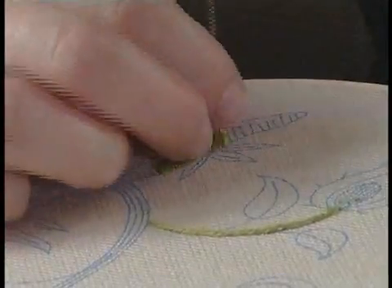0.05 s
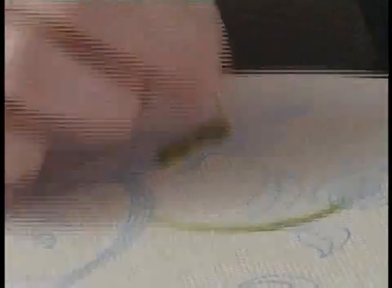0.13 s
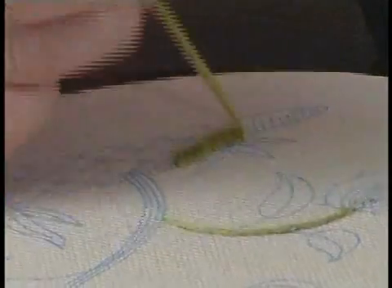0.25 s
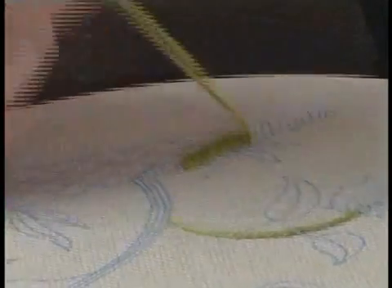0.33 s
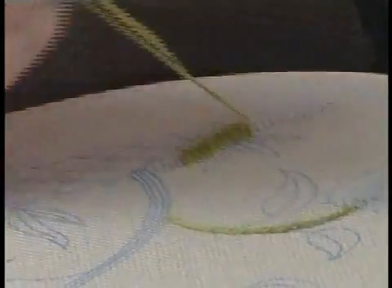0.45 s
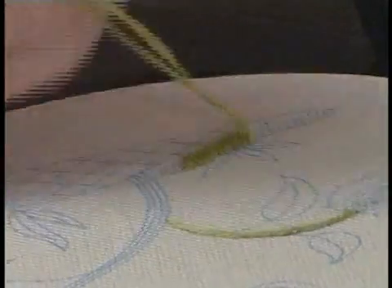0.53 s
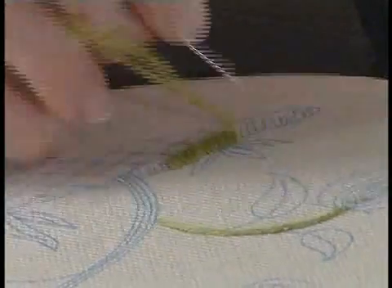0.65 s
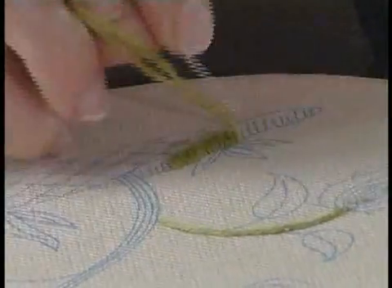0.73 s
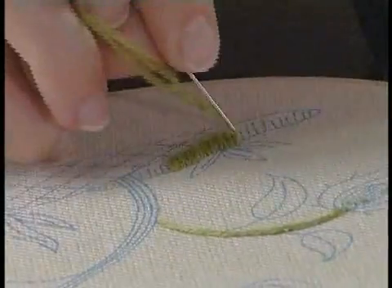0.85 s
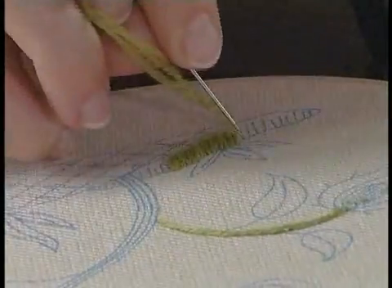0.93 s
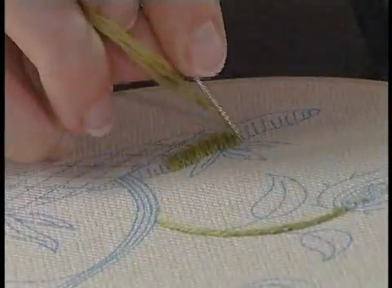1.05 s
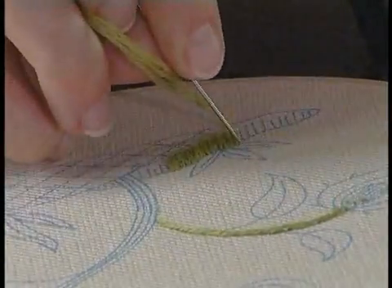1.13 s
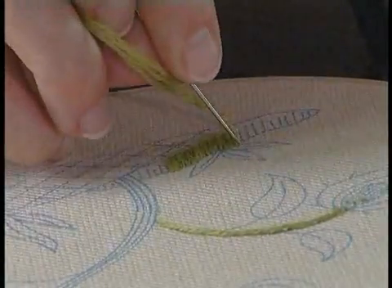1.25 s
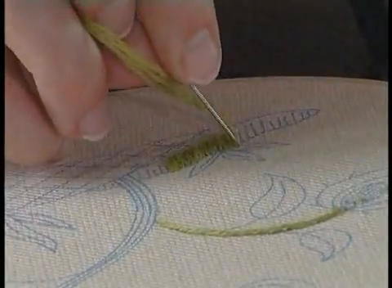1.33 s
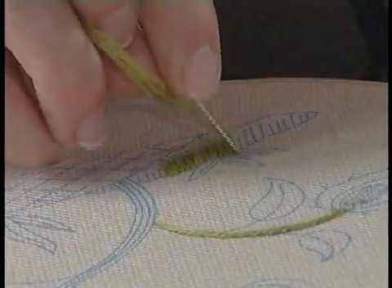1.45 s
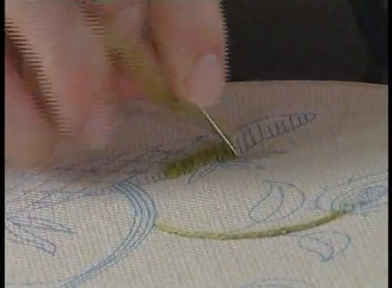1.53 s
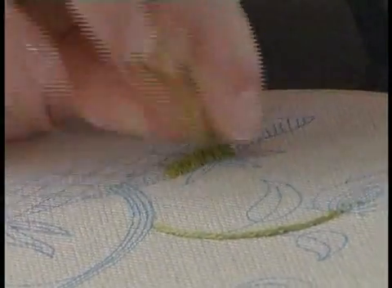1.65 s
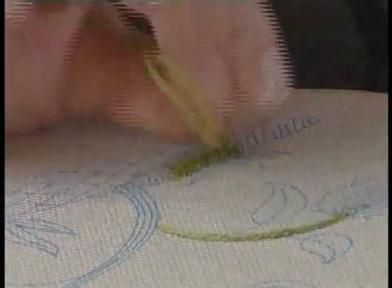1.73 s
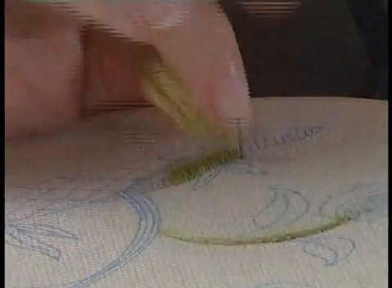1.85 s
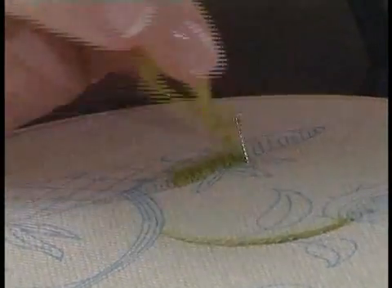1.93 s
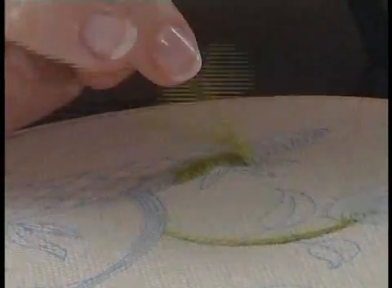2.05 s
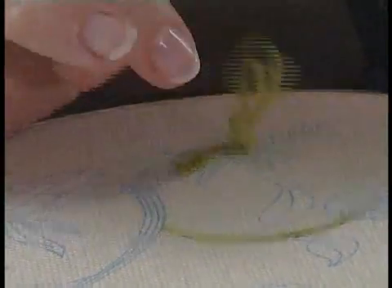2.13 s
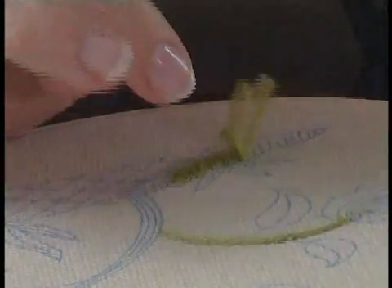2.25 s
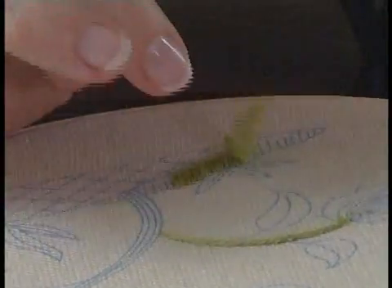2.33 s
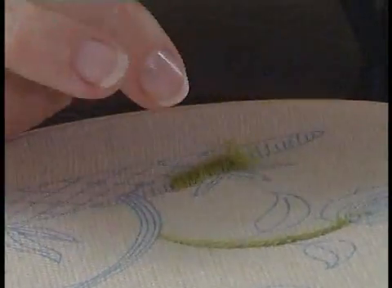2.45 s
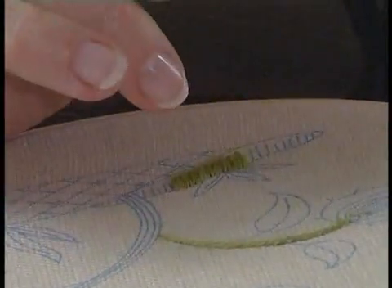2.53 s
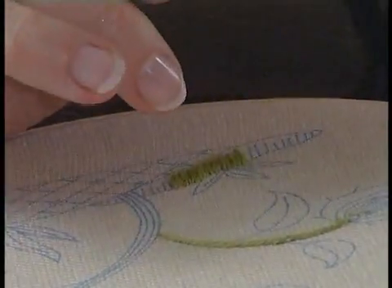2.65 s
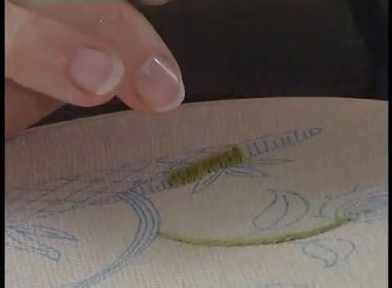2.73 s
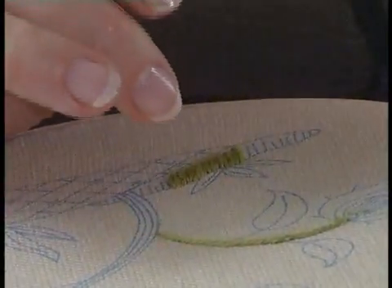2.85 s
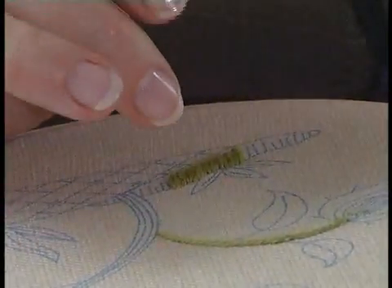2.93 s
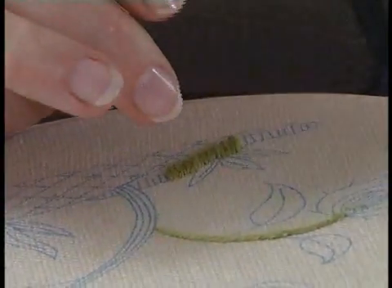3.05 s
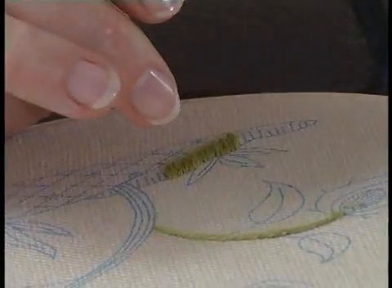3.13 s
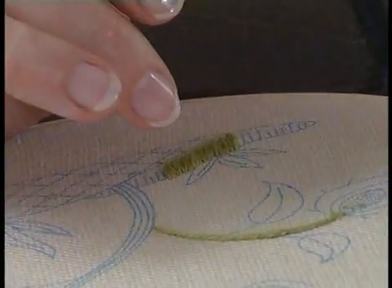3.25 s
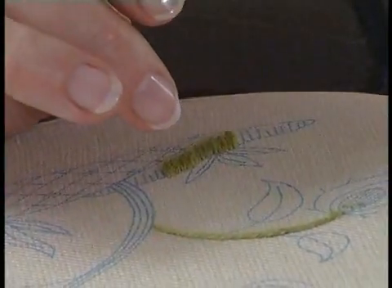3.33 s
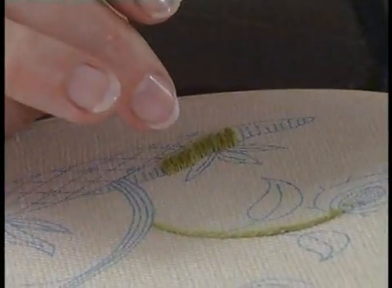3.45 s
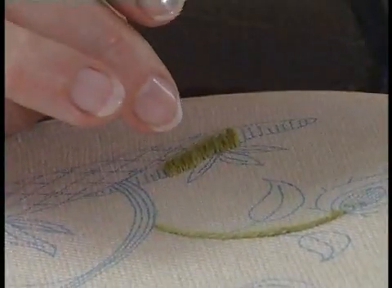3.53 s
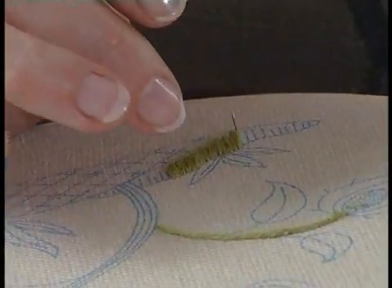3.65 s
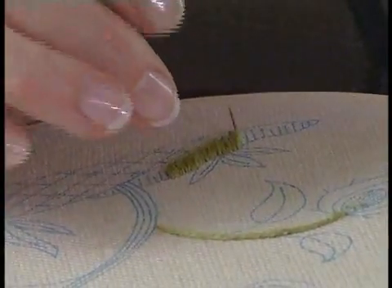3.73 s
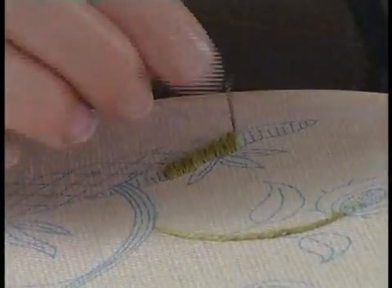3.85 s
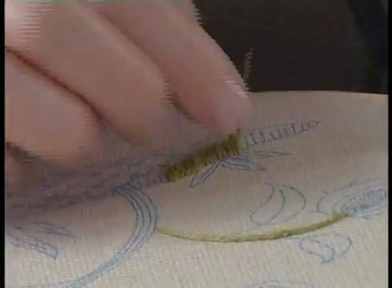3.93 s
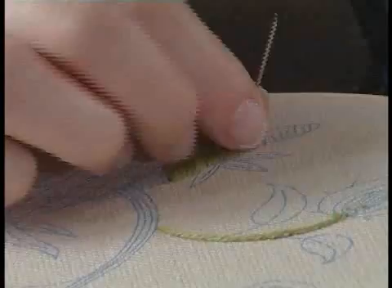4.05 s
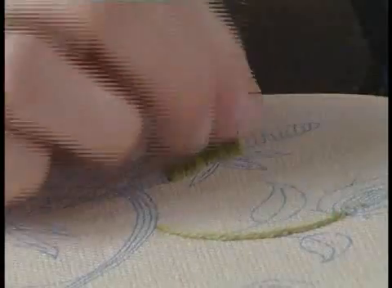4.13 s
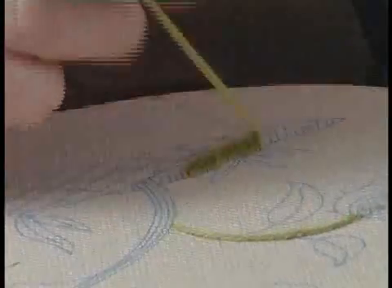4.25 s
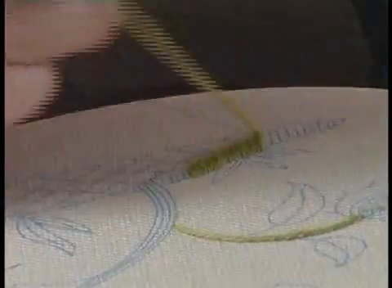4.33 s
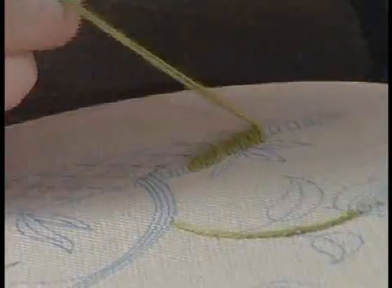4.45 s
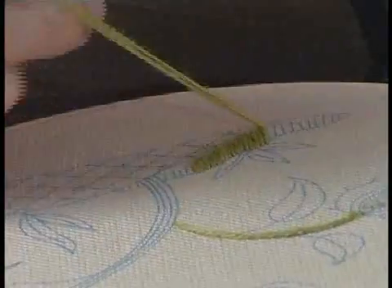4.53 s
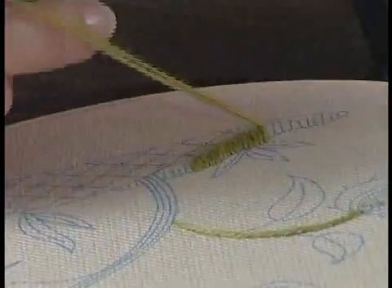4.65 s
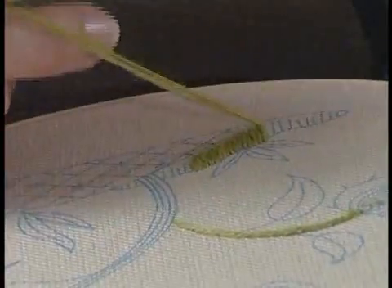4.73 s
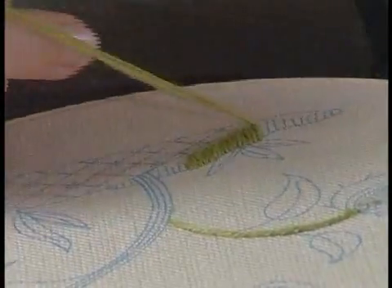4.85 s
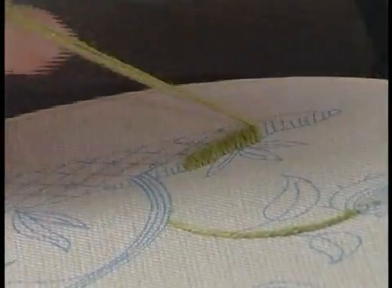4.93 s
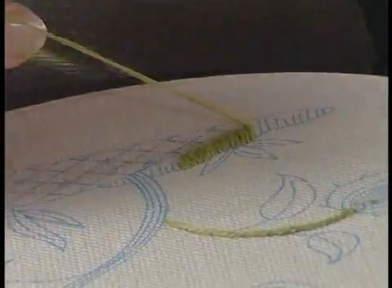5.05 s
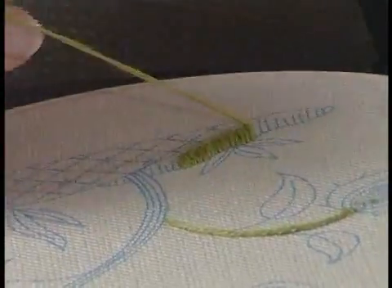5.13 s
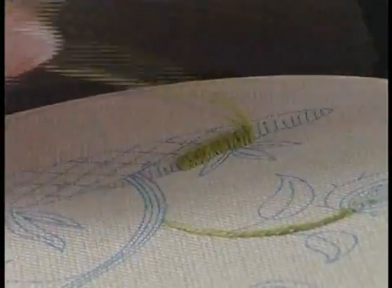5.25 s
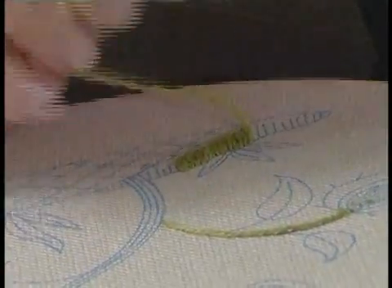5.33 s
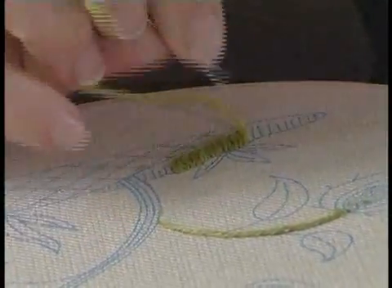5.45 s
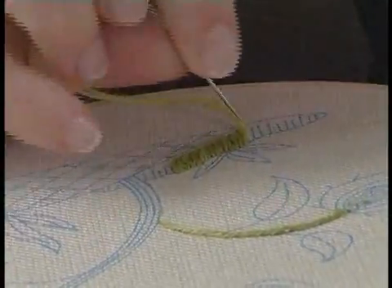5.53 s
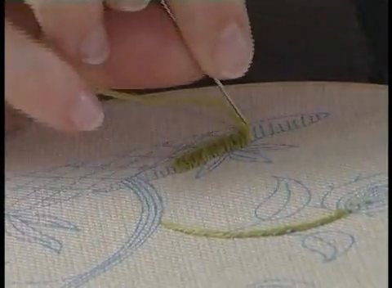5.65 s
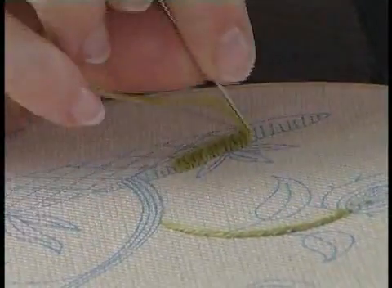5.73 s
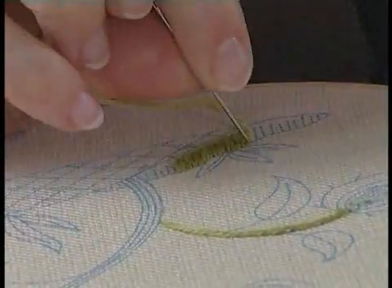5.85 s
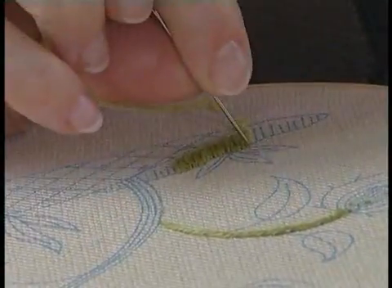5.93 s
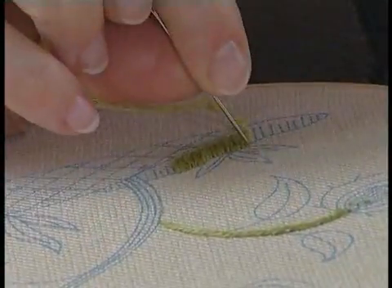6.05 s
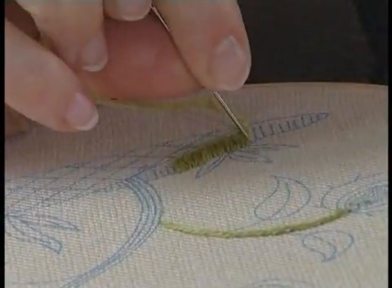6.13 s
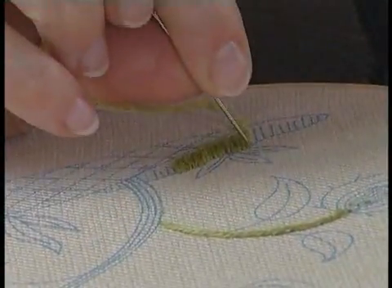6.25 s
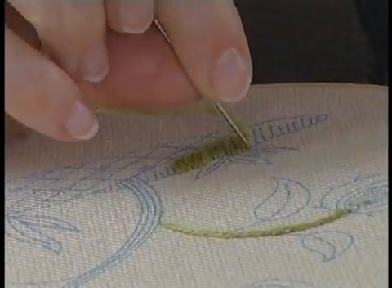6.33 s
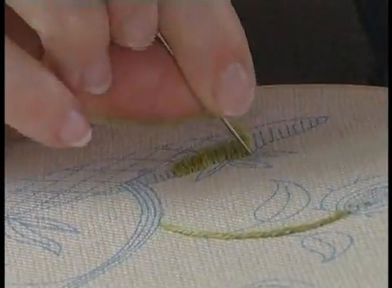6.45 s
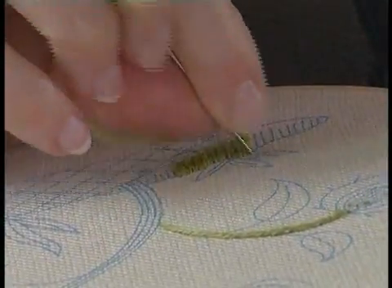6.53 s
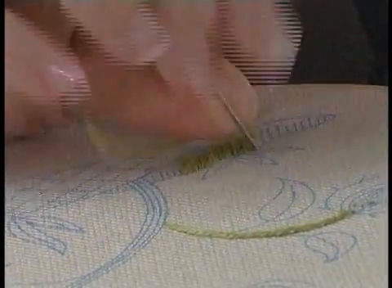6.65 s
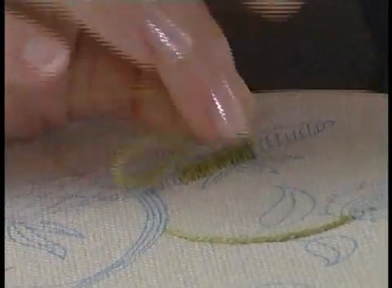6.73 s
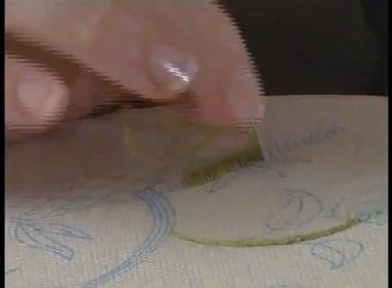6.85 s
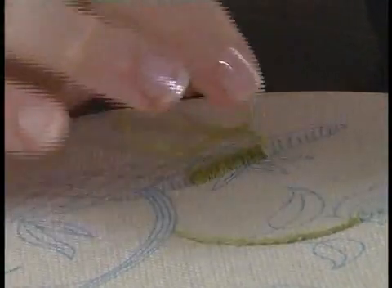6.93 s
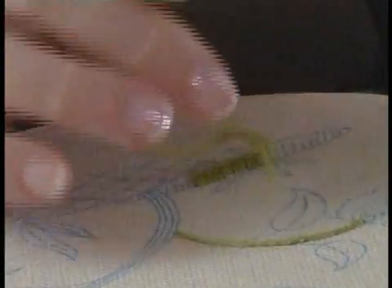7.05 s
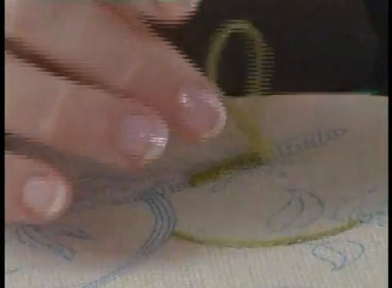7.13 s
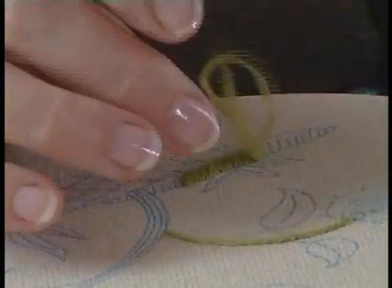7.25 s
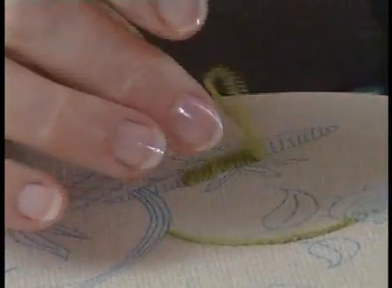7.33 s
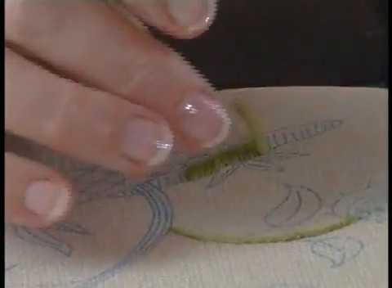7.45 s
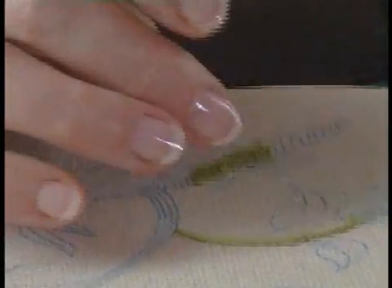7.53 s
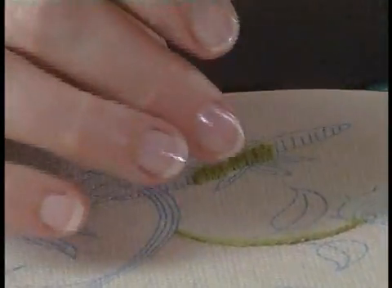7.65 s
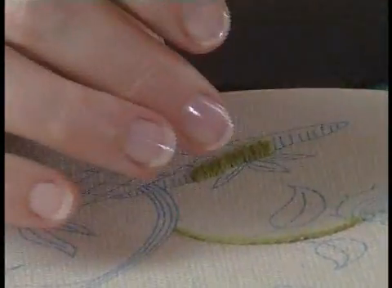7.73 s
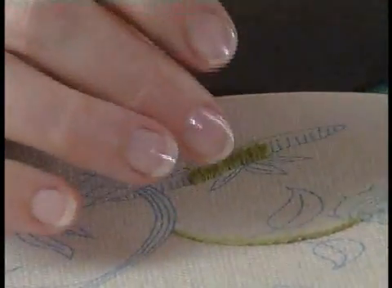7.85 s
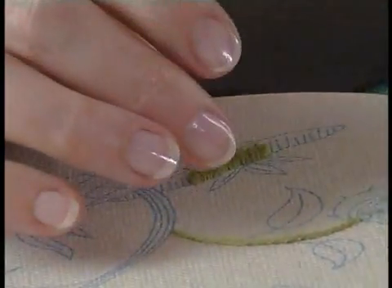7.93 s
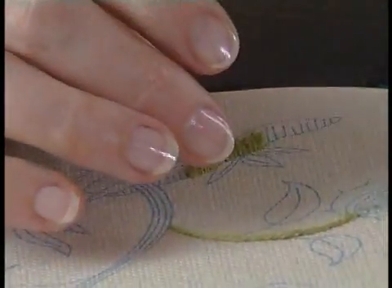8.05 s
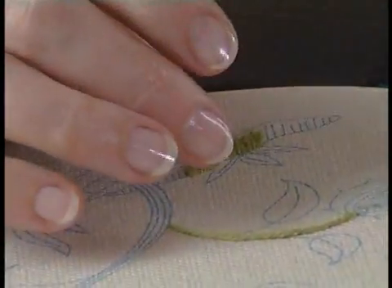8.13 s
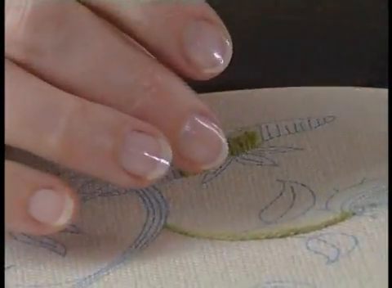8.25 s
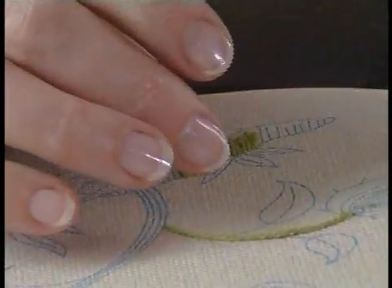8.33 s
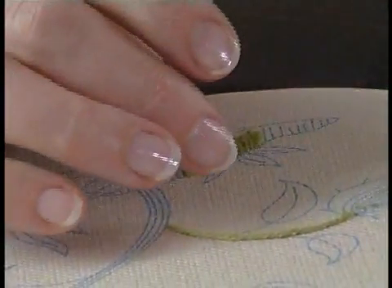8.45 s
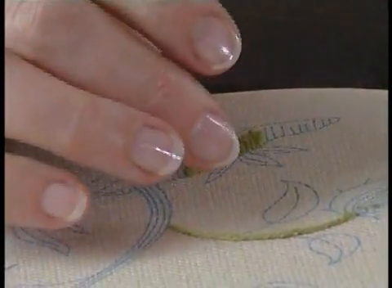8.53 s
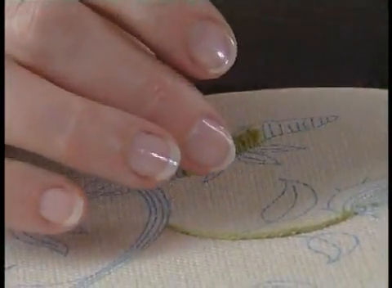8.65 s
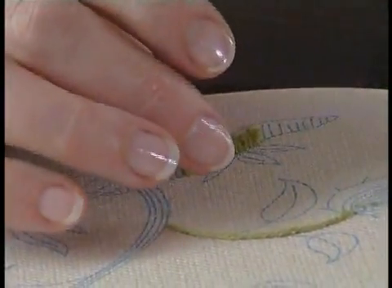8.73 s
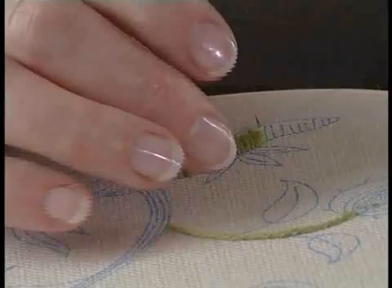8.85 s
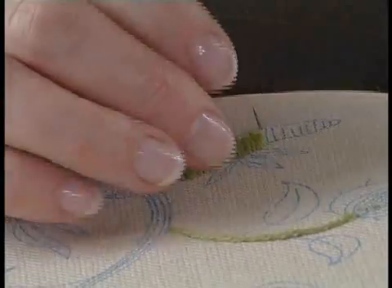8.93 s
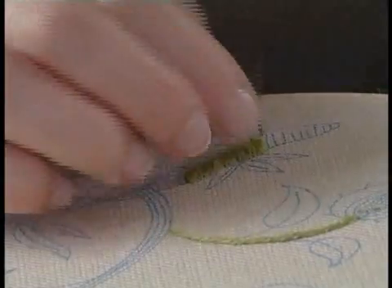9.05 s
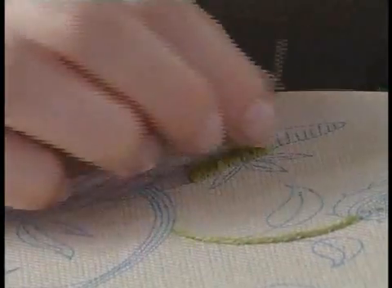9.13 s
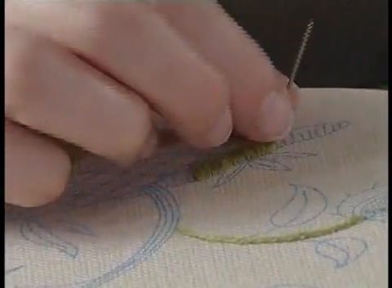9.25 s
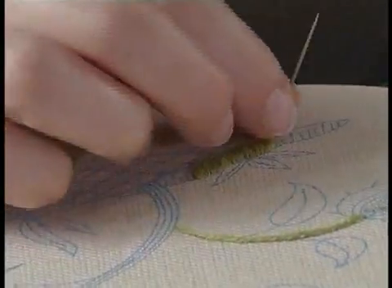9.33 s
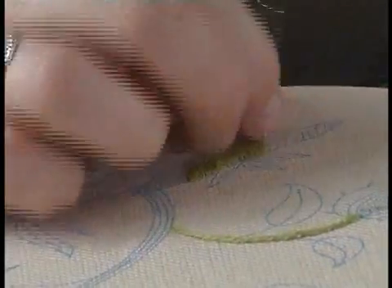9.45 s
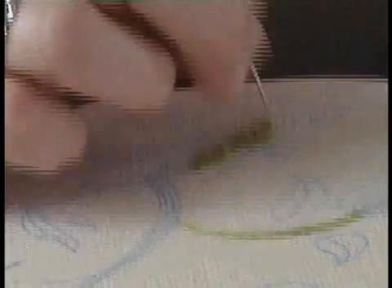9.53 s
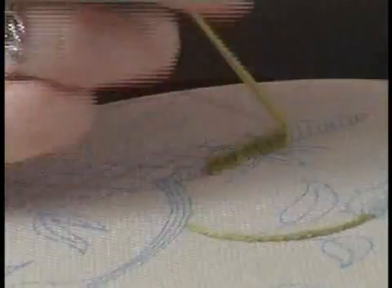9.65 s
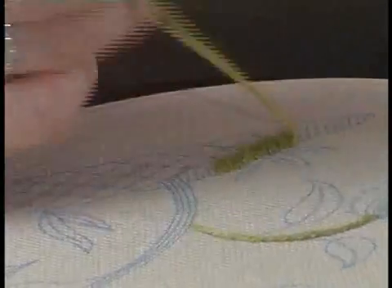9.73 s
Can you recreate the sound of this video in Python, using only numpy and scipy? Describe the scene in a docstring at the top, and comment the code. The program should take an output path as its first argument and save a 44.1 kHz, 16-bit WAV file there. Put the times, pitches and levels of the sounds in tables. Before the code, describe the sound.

Close hand embroidery: needle ticks, hollow pops of stretched cloth and soft thread pulls in a quiet, humming room.

```python
"""Embroidery in a quiet room

Close to the hoop, on a stereo pair of microphones. The needle ticks on the stretched fabric, its eye
pops through and the cloth sounds like a little drum, then the thread is drawn after it with a soft
rasp. The small room answers briefly; mains hum, room air and microphone hiss lie underneath."""
import sys
import numpy as np
from scipy import signal
from scipy.fft import rfft, irfft, next_fast_len
from scipy.io import wavfile
from scipy.ndimage import map_coordinates

SR = 44100
rng = np.random.default_rng(int(sys.argv[2]) if len(sys.argv) > 2 else 0)


def dump(signal):
    """Clip the signal to [-1, 1] and save it as 16-bit WAV at the path in sys.argv[1]."""
    limited = np.clip(np.atleast_2d(signal).T, -1, 1)
    pcm = np.round(limited * 32767).astype(np.int16)
    wavfile.write(sys.argv[1], SR, pcm)


N = 431738

# mains hum and a faint whine at the microphones: (frequency [Hz], left level [dB], right level [dB])
HUM_TONES = [(50.6, -86, -88.5), (100, -86, -85), (149.2, -99, -64.5), (335, -91, -85), (450, -95, -83),
             (1794, -86.5, -85), (3160, -99, -97.5), (3601, -99, -94)]
# colour of the room air and microphone hiss: (frequency [Hz], relative level [dB])
AIR_COLOUR = [(12, -58.5), (20, -20.5), (96, -19.5), (123, -8), (149, -12), (171, -12.5), (202, -13),
              (331, -12.5), (402, -14.5), (449, -13), (1310, -19.5), (1830, -20.5), (2760, -21.5),
              (13300, -24), (14400, -27)]
# how alike that air is at the two microphones: (frequency [Hz], correlation [clipped to -1..1])
AIR_LIKENESS = [(60, 2), (130, -1.03), (290, 0.17), (1000, 0)]
# which side the air leans to: (frequency [Hz], left minus right [dB])
AIR_BALANCE = [(60, 3), (150, -9.5), (400, -2.5), (1000, -2), (4000, -5.5), (9000, -5)]
# the steel point or tightening thread catches: (time [s], level [dB], knock [dB], tilt [dB/octave])
NEEDLE_TICKS = [(0.049, -51, -2, 6), (0.251, -22, -12, -7.5), (0.4075, -38.5, -8, 4), (0.417, -35, 9, 6),
                (0.4595, -31, 0, -10), (0.703, -51, 23, -4), (1.5536, -28.5, 2.5, -3),
                (1.6614, -36.5, 4, -11), (1.871, -39.5, 7, 5), (1.881, -32, -1.5, -10),
                (1.9118, -38, 20, 6.5), (3.165, -46, 6, 6), (4.3073, -19.5, -0.5, 4),
                (4.474, -33.5, 4, -14), (4.754, -52.5, 14, 2), (4.9545, -40.5, 7, -15),
                (5.003, -41.5, 15, 2), (6.680, -41, 8, -15), (6.925, -41, 8, -12), (8.463, -46.5, -2, -2),
                (8.772, -49, 6, 0), (9.638, -26, -1.5, -7)]
# resonances of the needle held in the weave: (frequency [Hz], width [Hz], relative level [dB])
NEEDLE_MODES = [(1500, 260, 0), (2050, 320, -3), (2850, 280, -7), (3480, 280, -5), (4100, 260, -12),
                (6000, 600, -20)]
# modes of the stretched cloth: (frequency [Hz], relative level [dB], t60 [s])
CLOTH_MODES = [(118.2, -16.5, 0.57), (168, -24, 0.2), (239.5, -20, 0.34), (314, -5.5, 0.15),
               (385, -12.5, 0.18), (457, -17.5, 0.085), (550, -21, 0.37), (689, -4.5, 0.056),
               (884, -18, 0.2), (1190, -10, .13)]
# thread and fingers slide on the cloth: (start [s], length [s], drumming [dB], rasp [dB], swell [dB])
THREAD_STROKES = [(0.177, 0.047, -69, -73, 9), (0.283, 0.14, -53.5, -60, -2.5),
                  (0.539, 0.26, -67, -75.5, -4), (1.847, 0.084, -59.5, -63, 3),
                  (1.975, 0.18, -64, -68.5, 2), (2.327, 0.24, -56.5, -65, 11), (3.913, 0.41, -71, -71, -1),
                  (4.327, 0.13, -49.5, -60.5, -5.5), (4.923, 0.26, -56, -70.5, -5),
                  (6.826, 0.11, -58, -60.5, -5.5), (6.998, 0.16, -65.5, -68.5, -4.5),
                  (7.29, 0.36, -61, -66.5, -4), (9.037, 0.25, -70, -68.5, -4), (9.575, 0.039, -66, -69, 7),
                  (9.674, 0.13, -57.5, -62.5, -7)]
# low drumming of the rubbed cloth: (frequency [Hz], relative level [dB])
DRUM_COLOUR = [(90, -26), (160, -9), (240, -5), (320, -1), (400, 3.5), (460, -5), (560, -9.5), (700, -7.5),
               (850, -22.5), (1200, -17.5), (2400, -31), (4000, -68)]
# fine rasp of fibre on fibre: (frequency [Hz], relative level [dB])
RASP_COLOUR = [(300, -15), (520, 8.5), (900, -3.5), (1400, -0.5), (2000, -2), (2700, -4), (4200, -5),
               (7000, -9.5), (10000, -12), (14500, -17)]
# cloth snaps back from needle or finger: (time [s], level [dB], hardness [dB], ring [dB], pitch [Hz])
CLOTH_POPS = [(0.2313, -34.5, -6, -15.5, 400), (0.2497, -15.5, -2.5, -24, 410), (1.637, -49, -4, -12, 380),
              (2.13, -50, -13, -11, 348), (2.2215, -16.5, 7.5, -16.5, 373), (3.075, -47.5, 10, -20, 365),
              (3.1645, -39.5, -1, -21.5, 410), (3.435, -49.5, 4, -27, 494), (3.554, -49, -1, -22, 510),
              (4.27, -41, -17, -6, 377), (4.286, -19, -1, -18, 412), (4.903, -44, 7, -12, 426),
              (4.980, -36.5, 1, -24, 470), (5.048, -41.5, 0, -18, 496), (5.157, -44, -3, -21, 382),
              (5.451, -51, -1, -26, 384), (6.2, -57, 0, -16, 400), (6.399, -53, -1, -19, 480),
              (7.2458, -21.5, 3, -22.5, 335), (8.086, -49, 0, -16, 430), (8.127, -48, 5, -23, 586),
              (9.6265, -42.5, -12, -8.5, 436), (9.6622, -17, -1.5, -23.5, 414)]
# decay of the small room: (frequency [Hz], t60 [s])
ROOM_DECAY = [(130, 0.77), (350, 0.17), (800, 0.3), (2000, 0.23), (10000, 0.23)]


def amp(db):
    """Decibels to gain."""
    return 10 ** (np.asarray(db) / 20)


def stereo(left_db, right_db):
    """Gains at the left and right microphones."""
    return amp([[left_db], [right_db]])


def unit(x):
    """Scaled to rms 1."""
    return x / np.sqrt(np.mean(x ** 2) + 1e-20)


def along(points, hz):
    """(frequency [Hz], value) points read on a log axis."""
    f, v = np.transpose(points)
    return np.interp(np.log(hz + 1), np.log(f + 1), v)


def wobble(rate):
    """A smooth random curve, rate knots a second."""
    return map_coordinates(rng.standard_normal(int(N * rate / SR) + 4), [np.arange(N) * rate / SR])


def filtered(x, response):
    """x shaped by a gain over frequency."""
    size = next_fast_len(N + SR // 4)
    return irfft(rfft(x, size) * response(np.fft.rfftfreq(size, 1 / SR)), size)[..., :N]


def pulse(gain, size=4096):
    """The shortest causal pulse with this gain over frequency, peak 1."""
    cepstrum = irfft(np.log(np.maximum(gain(np.fft.rfftfreq(size, 1 / SR)), 1e-6)))
    fold = np.r_[1, np.full(size // 2 - 1, 2), np.zeros(size // 2)]
    x = irfft(np.exp(rfft(cepstrum * fold)))
    return x / np.abs(x).max()


def add(track, time, sound):
    """Mix a sound into the stereo track at a time in seconds."""
    part = track[:, max(round(time * SR), 0):][:, :sound.shape[1]]
    part += sound[:, :part.shape[1]]


def in_room(x, near_db, tail_db, near_t60):
    """At the microphones: the direct sound, quick echoes from things nearby, the room's longer tail."""
    hz, t, spectrum = signal.stft(rng.standard_normal((2, SR // 2)), SR, nperseg=256)
    tail = signal.istft(spectrum * amp(-60 * t / along(ROOM_DECAY, hz)[:, None]), SR, nperseg=256)[1]
    t = np.arange(tail.shape[1]) / SR
    tail *= 1 - np.exp(-(t / 0.0084) ** 2)
    near = rng.standard_normal(tail.shape) * amp(-60 * t / near_t60) * (1 - np.exp(-(t / 0.0012) ** 2))
    response = (amp(near_db) * unit(near) + amp(tail_db) * unit(tail)) / np.sqrt(len(t))
    response[:, 0] += 1  # the direct path
    return signal.fftconvolve(x, response, axes=1)


def room_tone():
    """Steady mains hum over room air and microphone hiss."""
    t = np.arange(N) / SR
    hum = sum(stereo(left, right) * np.sqrt(2) * np.sin(2 * np.pi * hz * t + 0.064 * wobble(2.4))
              for hz, left, right in HUM_TONES)
    width = lambda f: np.arccos(np.clip(along(AIR_LIKENESS, f), -1, 1)) / 2
    mid_side_gain = lambda f: amp(along(AIR_COLOUR, f)) * [np.cos(width(f)), np.sin(width(f))]
    mid, side = filtered(rng.standard_normal((2, N)), mid_side_gain)
    balance = lambda f: amp(np.outer([0.5, -0.5], along(AIR_BALANCE, f)))
    air = filtered(np.array([mid + side, mid - side]), balance)
    return hum + amp(-64) * unit(air)


def needle_ticks():
    """A stiff catch rings the needle for a few milliseconds and knocks lightly on the cloth."""
    track = np.zeros((2, N))
    mode = lambda f, hz, width: f * width / np.abs(hz * hz - f * f + 1j * f * width)
    for time, level_db, knock_db, tilt in NEEDLE_TICKS:
        steel = lambda f: sum((amp(db + tilt * np.log2(hz / 1500)) * mode(f, hz, width)) ** 2
                              for hz, width, db in NEEDLE_MODES)
        knock = lambda f: (amp(knock_db + 1) * mode(f, 586, 240) * mode(f, 320, 690)) ** 2
        cushion = lambda f: 1 + (f / 5000) ** 4  # the cloth softens the contact
        click = pulse(lambda f: np.sqrt((steel(f) + knock(f)) / cushion(f)))
        click += amp(-15.5 + 0.91 * tilt) * fibre_snap()  # a sharper catch snaps more fibres
        ring = stereo(-19, -15) * cloth_ring(click, scatter_db=4.5, skew_rad=0.88)
        sound = ring + stereo(2, -1.5) * np.pad(click, (0, ring.shape[1] - len(click)))
        add(track, time, amp(level_db - 1.5) * in_room(sound, near_db=1.5, tail_db=-5, near_t60=0.016))
    return track


def fibre_snap(t60=0.014, size=4096):
    """Threads of the weave let go one after another: a few milliseconds of bright noise, peak 1."""
    t = np.arange(size) / SR
    burst = rng.standard_normal(size) * amp(-60 * t / t60)
    colour = [(1500, -44), (2800, -2), (3900, 3.5), (4900, -5), (8000, -8.5), (14000, -20.5)]
    snap = signal.fftconvolve(burst, pulse(lambda f: amp(along(colour, f))))[:size]
    return snap / np.abs(snap).max()


def cloth_ring(blow, scatter_db, skew_rad):
    """A blow rings the cloth's modes, which reach the two microphones a little out of step."""
    t = np.arange(SR // 4) / SR
    ring = np.zeros((2, len(t)))
    for hz, db, t60 in CLOTH_MODES:
        decay = amp(db + scatter_db * rng.standard_normal() - 60 * t / t60)
        ring += decay * np.cos(2 * np.pi * hz * t + skew_rad * rng.standard_normal((2, 1)))
    return signal.fftconvolve(blow[None], ring / np.linalg.norm(ring[0]), axes=1)


def thread_strokes(attack_s=0.042, release_s=0.023, arch_db=0.5, uneven_db=1.5):
    """Sliding thread plucks the weave: the cloth drums softly below, the fibres rasp above."""
    t = np.arange(N) / SR
    drum, rasp = np.zeros(N), np.zeros(N)
    drag = amp(uneven_db * wobble(25))  # the hand's drag varies by chance
    for start, length, drum_db, rasp_db, swell_db in THREAD_STROKES:
        end = start + length
        contact = np.interp(t, [start - attack_s, start, end, end + release_s], [0, 1, 1, 0])
        travel = np.interp(t, [start, end], [-1, 1])
        speed_db = arch_db * (0.5 - travel ** 2)  # the hand is fastest in mid-stroke
        effort = drag * contact * amp(swell_db * travel / 2 + speed_db)
        drum += effort * amp(drum_db)
        rasp += effort * amp(rasp_db)
    coarse = fibre_slips(per_second=800, spread_db=3.5, apart_db=2)
    fine = fibre_slips(per_second=7000, spread_db=2.6, apart_db=9.5)
    low = stereo(0, 1) * drum * unit(filtered(coarse, lambda f: amp(along(DRUM_COLOUR, f))))
    high = stereo(2, 1.5) * rasp * unit(filtered(fine, lambda f: amp(along(RASP_COLOUR, f))))
    return in_room(low + high, near_db=-8.5, tail_db=-5, near_t60=0.015)[:, :N]


def fibre_slips(per_second, spread_db, apart_db):
    """Tiny slips of fibre on fibre at random moments and sizes, partly unrelated left and right."""
    slips = (rng.random((3, N)) < per_second / SR) * rng.standard_normal((3, N))
    return (slips[0] + amp(apart_db) * slips[1:]) * amp(spread_db * wobble(70))


def stray_fibres(per_stroke=2, level_db=-59, spread_db=4.5):
    """Now and then a single fibre lets go while the thread slides."""
    track = np.zeros((2, N))
    for start, length, *_ in THREAD_STROKES:
        for when, size in zip(rng.random(per_stroke), rng.standard_normal(per_stroke)):
            snap = amp(level_db + spread_db * size) * fibre_snap(t60=0.0063)
            add(track, start + when * length, snap[None])
    return in_room(track, near_db=3, tail_db=-6, near_t60=0.013)[:, :N]


def cloth_pops():
    """The released cloth gives one broad push, then rings on like a drumhead."""
    track = np.zeros((2, N))
    for time, level_db, hardness_db, ring_db, hz in CLOTH_POPS:
        # a harder release is a shorter push: more crack and snap, less bass
        crack_db = -17 + hardness_db
        snap_db = -18.5 + 0.4 * hardness_db
        bass_db = -15 - 0.67 * hardness_db
        colour = [(30, -41), (80, bass_db - 15), (160, bass_db + 1.5), (0.91 * hz, 0), (1.26 * hz, -1),
                  (1000, crack_db - 2), (1400, crack_db - 6.5), (1950, crack_db - 6),
                  (2700, crack_db - 24), (6000, -50), (14000, -70)]
        push = pulse(lambda f: amp(along(colour, f)))
        ring = stereo(ring_db - 1.5, ring_db + 6) * cloth_ring(push, scatter_db=1.5, skew_rad=0.6)
        blow = push + amp(snap_db) * fibre_snap()
        sound = ring + stereo(1.8, -0.8) * np.pad(blow, (0, ring.shape[1] - len(blow)))
        at_mics = in_room(sound, near_db=-6, tail_db=-3.5, near_t60=0.052)
        add(track, time, amp(level_db - 2.17) * at_mics)
    return track


def scene():
    """Cloth, needle and thread close by, the quiet room behind."""
    return cloth_pops() + needle_ticks() + thread_strokes() + stray_fibres() + room_tone()


def record(dry):
    """The recorder keeps nothing above its band limit."""
    return filtered(dry, lambda hz: hz < 14450)


dry = scene()
out = record(dry)
dump(out)
```